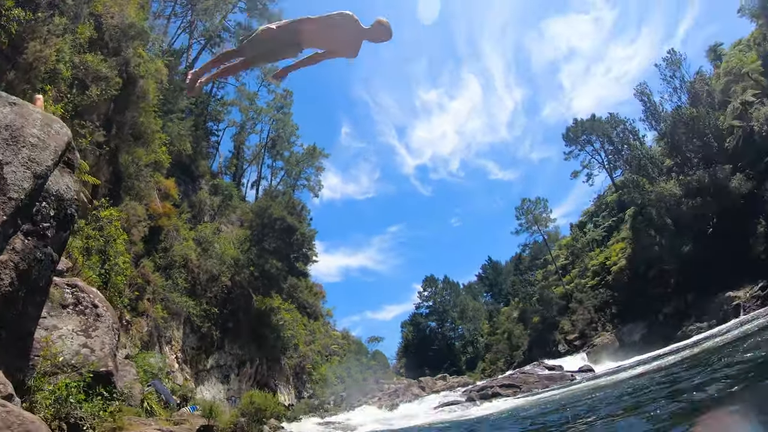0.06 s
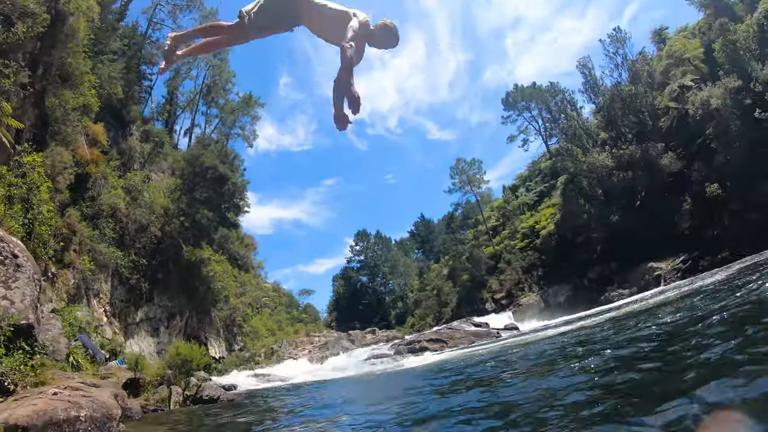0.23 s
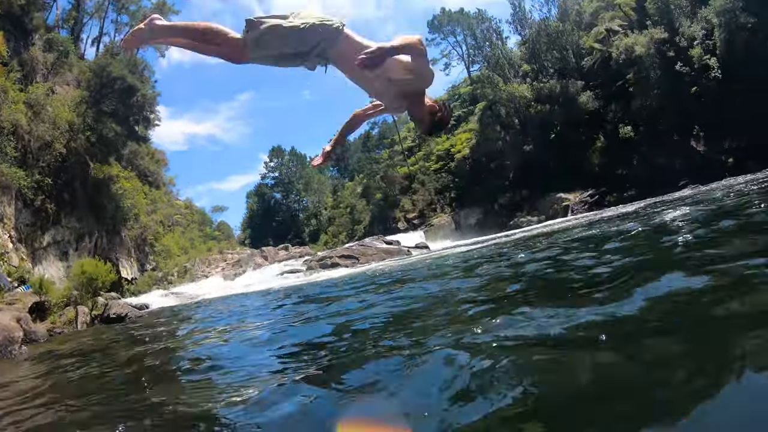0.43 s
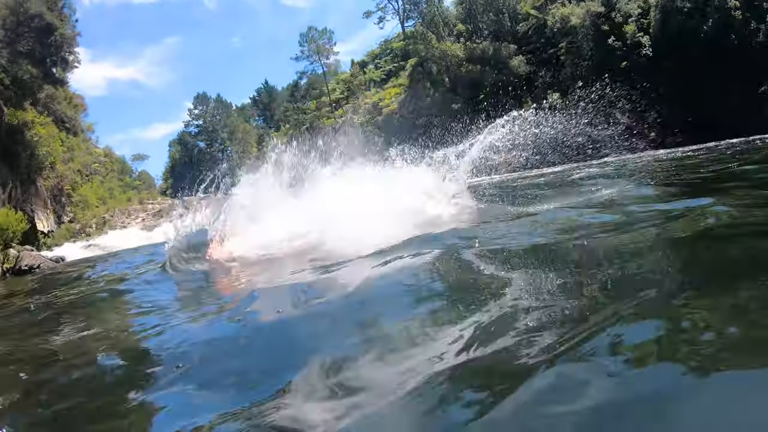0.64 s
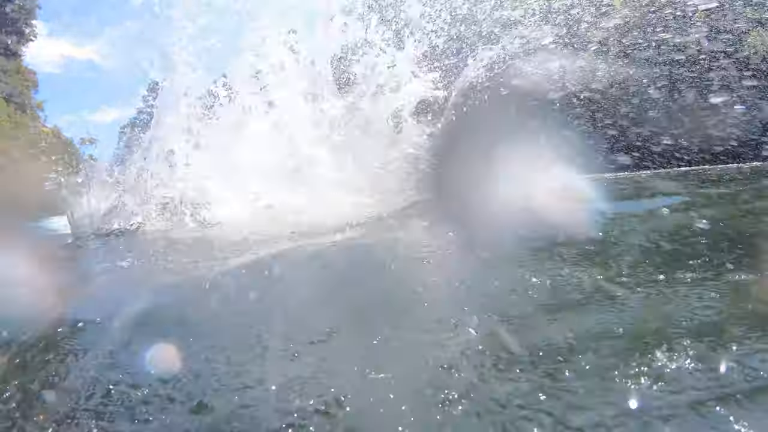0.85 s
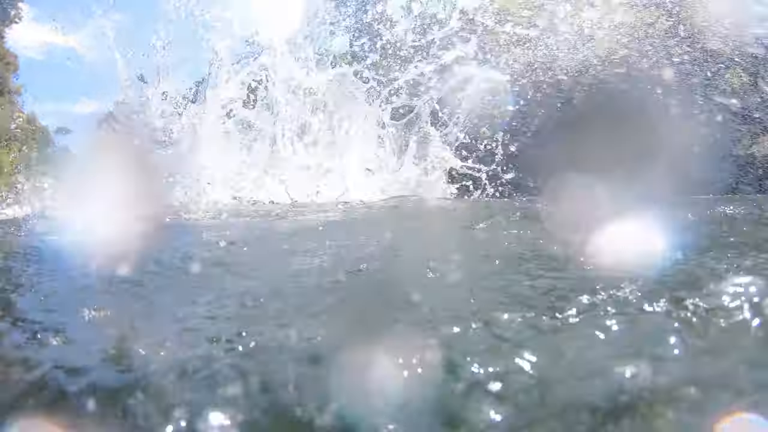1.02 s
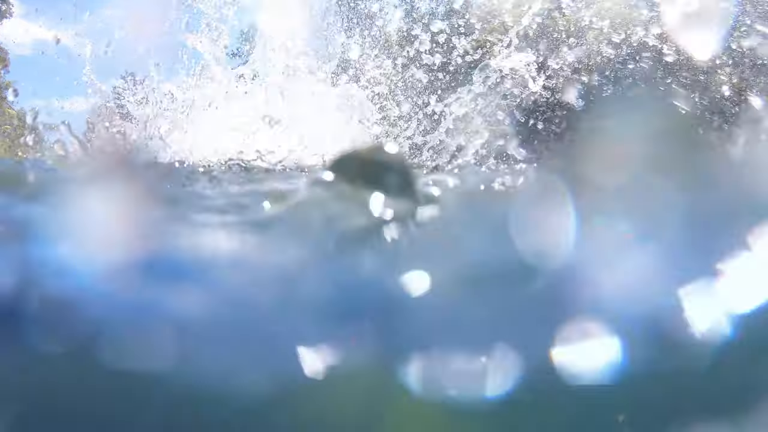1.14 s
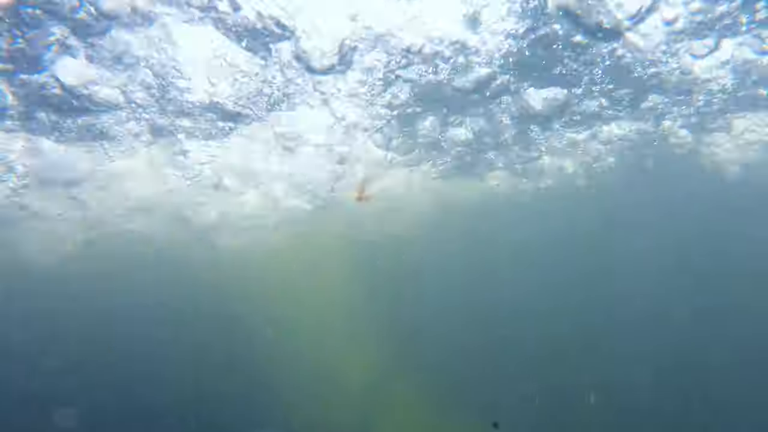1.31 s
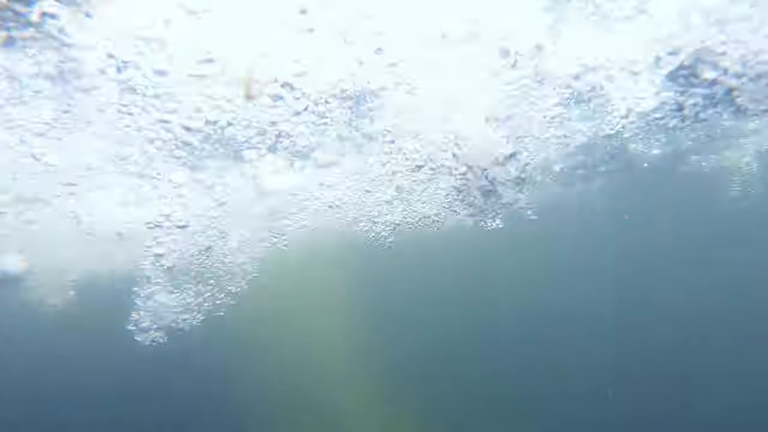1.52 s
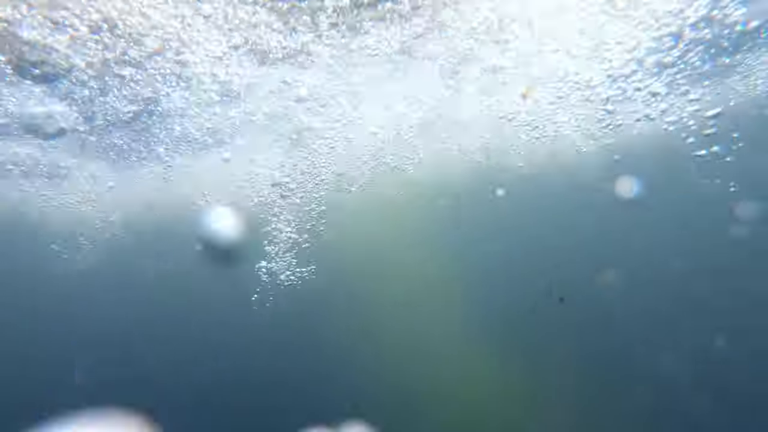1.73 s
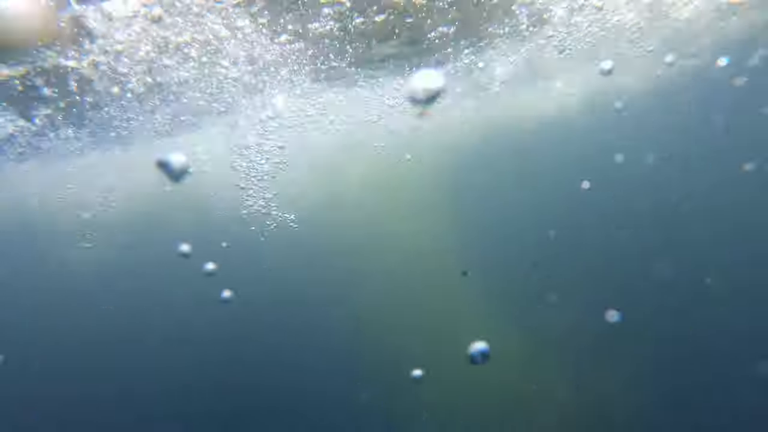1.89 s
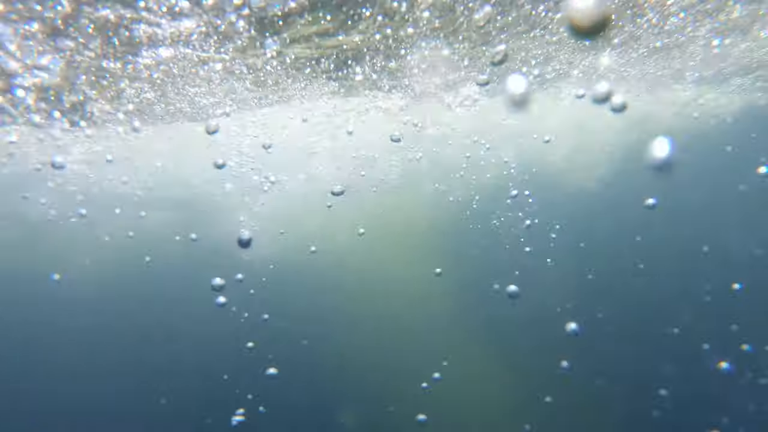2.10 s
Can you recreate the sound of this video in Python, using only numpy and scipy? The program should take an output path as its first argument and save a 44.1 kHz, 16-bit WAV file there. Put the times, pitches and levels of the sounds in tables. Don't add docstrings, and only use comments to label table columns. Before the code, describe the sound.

A diver's body smacks into river water with a big hissing splash, then muffled underwater bubbling

```python
import sys
import numpy as np
from scipy import signal
from scipy.fft import irfft
from scipy.io import wavfile

SR = 44100
rng = np.random.default_rng(int(sys.argv[2]) if len(sys.argv) > 2 else 0)


def attenuation_scalar(level_db):
    decades = np.asarray(level_db, float) / 20
    return 10 ** decades


def put_to_file(sound):
    columns = np.atleast_2d(sound).T
    safe = np.clip(columns, -1, 1)
    whole_steps = np.round(safe * 32767)
    wavfile.write(sys.argv[1], SR, whole_steps.astype(np.int16))


N = 94815
TIME = np.arange(N) / SR
SINK_S = 1.217
FLUTTER_END_S = 0.7


def rms_one(x):
    return x / np.sqrt(np.mean(x ** 2) + 1e-20)


def in_time(rows):
    s, *columns = np.transpose(rows)
    return [np.interp(TIME, s, c) for c in columns]


def drift(rate):
    step = 40
    r = np.exp(-2 * np.pi * rate * step / SR)
    warm_up = 2000
    noise = rng.standard_normal(N // step + warm_up + 2)
    slow = signal.lfilter([1], [1, -2 * r, r * r], noise)[warm_up:]
    return np.interp(np.arange(N) / step, np.arange(len(slow)), rms_one(slow))


def ring(clicks, hz, t60):
    r = attenuation_scalar(-60 / (t60 * SR))
    w = 2 * np.pi * hz / SR
    return signal.lfilter([0, np.sin(w)], [1, -2 * r * np.cos(w), r * r], clicks + 1e-18)


def grains(per_s, spread_db):
    size = attenuation_scalar(spread_db * np.minimum(rng.exponential(1, N), 5)) * rng.choice([-1, 1], N)
    return rms_one(size * (rng.random(N) < per_s / SR))


def coloured(sources, spectrum, patchy_db, rate, tilt_db=0):
    together = drift(rate)
    edges = 70 * 2 ** np.arange(0, 8.1, .5)
    hz_pts, db_pts = np.transpose(spectrum)
    out, power = 0, 0
    for k, (low, high) in enumerate(zip(edges, edges[1:])):
        hz = np.sqrt(low * high)
        level = np.interp(np.log(hz), np.log(hz_pts), db_pts)
        power += attenuation_scalar(level) ** 2 * (high - low) / SR * 2
        sos = signal.butter(2, [low, high], "band", fs=SR, output="sos")
        band = signal.sosfilt(sos, sources[k % 2])
        tilt = tilt_db * max(np.log2(hz / 1800), 0)
        flicker = patchy_db * (0.7 * together + drift(rate))
        out = out + band * attenuation_scalar(level + tilt + flicker)
    return out / np.sqrt(power)


def add(out, s, piece):
    i = int(s * SR)
    out[i:i + len(piece)] += piece[:len(out) - i]


def spray():
    # (time [s], level [dB], brightness [about 0-1])
    course = [(.622, -43, 1), (.632, -28.5, 0.8), (.66, -20, 1), (.695, -27, 0.88), (.703, -27.5, 0.67),
              (.733, -24, 0.35), (.745, -45.5, 0.3), (.8, -68.5, 1), (.87, -44, 0), (.93, -30.5, 0.02),
              (.955, -36, 0.1), (.98, -44, 0), (1.01, -32, 0), (1.06, -39, 0), (1.11, -30.5, -.1),
              (1.15, -32, -.25), (1.2, -26.5, -.3), (1.225, -49, -.3), (1.36, -67, 0)]
    # (frequency [Hz], level [dB per Hz])
    colour = [(100, 0.5), (350, -3.5), (700, -8), (1400, -10), (2800, -12), (5600, -14.5), (10000, -24),
              (15500, -30.5)]
    db, bright = in_time(course)
    fade_in = np.clip((TIME - course[0][0]) / 0.022, 0, 1)
    fade_out = np.clip((course[-1][0] - TIME) / 0.1, 0, 1)
    fine = grains(per_s=12000, spread_db=2.2)
    crackle = 0.3 * (1 - bright) * grains(per_s=600, spread_db=2.5)
    sources = [fine * bright + 0.67 * noise + crackle for noise in rng.standard_normal((2, N))]
    water = coloured(sources, colour, patchy_db=1.6, rate=74, tilt_db=11.5 * (bright - 1))
    return fade_in * fade_out * attenuation_scalar(db + 1.5) * water


def thumps():
    # (time [s], peak level [dB], frequency [Hz])
    pushes = [(0.656, -18, 76), (0.6841, -14.5, 190), (0.7338, -4, 315), (0.8338, -12.5, 145),
              (0.878, -20, 159), (.887, -28, 199), (0.896, -19.5, 180), (.951, -16.5, 178),
              (1.104, -25.5, 167), (1.129, -23, 179), (1.191, -20, 172), (0.9439, -13.5, 194),
              (1.2539, -10.5, 161), (1.274, -18, 153), (1.309, -8.5, 115.7), (1.3262, -2, 195),
              (1.331, -11.5, 213), (1.3633, -5.5, 226), (1.3655, -3, 189), (1.434, -11, 150.5),
              (1.4442, -13, 172), (1.477, -16.5, 144), (1.4993, -7, 160.6), (1.535, -20, 130),
              (1.582, -23.5, 170), (1.655, -18.5, 111), (1.638, -27.5, 147.5), (1.814, -26, 119.6),
              (1.882, -13.5, 89.3)]
    fade_cycles, softness, gain_db = 2.54, 1.24, 6
    out = np.zeros(N)
    t = np.arange(3000) / SR
    for s, db, hz in pushes:
        w = 2 * np.pi * hz
        fade = attenuation_scalar(-60 * t * hz / fade_cycles)
        soft_start = 1 - np.exp(-softness * w * t)
        add(out, s, attenuation_scalar(db + gain_db) * np.sin(w * t) * fade * soft_start)
    return out


def drops():
    # (time [s], peak level [dB], centre [Hz], decay [s])
    landings = [(.722, -9, 1250, 0.008), (.732, -20, 900, 0.0011), (0.751, -28.5, 4020, 0.00069),
                (0.771, -32, 8000, 0.00048), (0.839, -18.5, 3480, 0.00064), (0.845, -38.5, 6400, 0.00043),
                (.859, -24, 3350, 0.00093), (0.867, -28, 2620, 0.0019), (0.876, -18, 920, 0.0074),
                (.894, -21, 1240, 0.00081), (0.911, -11.5, 1350, 0.0011), (.916, -31, 1580, 0.00048),
                (0.926, -30, 3000, 0.00082), (0.928, -16.5, 3000, 0.0017), (0.9312, -23, 4000, 0.0007),
                (0.9417, -6.5, 2510, 0.00095), (0.948, -24, 3500, 0.00068), (.965, -37.5, 4500, 0.00048),
                (0.993, -26, 1770, 0.0023), (1.005, -28, 1790, 0.0011), (1.011, -20, 1450, .002),
                (1.026, -37.5, 3200, 0.0007), (1.043, -37.5, 4770, 0.00074), (1.095, -26, 4100, 0.0012),
                (1.116, -28.5, 4500, 0.00092), (1.126, -23.5, 3860, 0.0059), (1.171, -27, 4240, 0.006),
                (1.187, -36, 5600, 0.0011), (1.203, -10.5, 1170, 0.0014), (1.212, -16, 790, 0.0024)]
    # (time [s], peak level [dB], centre [Hz], decay [s])
    ticks = [(1.219, -33, 3600, 0.00084), (1.231, -45, 3600, 0.00092), (1.246, -41, 3600, .001),
             (1.274, -47, 4600, .002), (1.299, -42, 3800, .0012), (1.3012, -45, 5800, .001),
             (1.309, -45, 5600, 0.0012), (1.344, -49, 5200, 0.0017), (1.361, -46, 4600, 0.00062),
             (1.370, -35, 2400, 0.00079), (1.38, -45, 2300, 0.0018), (1.404, -43, 2100, 0.0018),
             (1.419, -37, 2000, 0.0017), (1.444, -41, 1800, 0.0016), (1.478, -47, 3300, 0.0018),
             (1.905, -55, 2400, .002), (2.028, -58, 5400, 0.00073), (2.106, -50.5, 3800, 0.0019),
             (1.252, -18.5, 800, 0.0023), (1.273, -23.5, 686, 0.0035), (1.302, -32.5, 2000, 0.0003),
             (1.308, -18, 686, 0.013), (1.324, -29.5, 5050, 0.00073), (1.329, -20.5, 1260, 0.00055),
             (1.339, -18.5, 750, 0.0058), (1.358, -41, 2240, 0.0015), (1.374, -15.5, 765, 0.0021),
             (1.392, -35.5, 1960, .003), (1.477, -23, 1010, 0.0034), (1.488, -13.5, 606, 0.0013),
             (1.5, -19, 870, 0.0028), (1.532, -24.5, 1040, 0.003), (1.547, -41, 1830, 0.0034),
             (1.835, -49.5, 2310, 0.0018), (1.988, -47, 2830, 0.0016), (2.062, -40.5, 3140, 0.0026)]
    out = np.zeros(N)
    t = np.arange(1200) / SR
    for s, db, hz, decay in landings + ticks:
        order, reach_down = (3, 1.4) if s > SINK_S else (2, 2)
        limits = [hz / reach_down, min(hz * 1.222, .45 * SR)]
        band = signal.butter(order, limits, "band", fs=SR, output="sos")
        splat = signal.sosfilt(band, rng.standard_normal(len(t)) * np.exp(-t / decay))
        add(out, s, attenuation_scalar(db) * splat / np.abs(splat).max())
    return out * attenuation_scalar(-4.5)


def bubbles():
    # (centre time [s], level [dB], frequency [Hz], half length [s])
    tones = [(0.863, -35.5, 1377, 0.004), (0.729, -17.5, 502, 0.0046), (1.534, -29.5, 742, 0.0072),
             (1.585, -26, 596, 0.0064), (1.594, -35.5, 828, 0.0036), (1.602, -23.5, 417.6, 0.0033),
             (1.614, -28.5, 558, 0.015), (1.634, -27, 988, 0.006), (1.708, -28.5, 633, 0.0061),
             (1.813, -15.5, 511, 0.0033), (1.839, -29.5, 619, 0.0024), (1.857, -24, 566, 0.0077),
             (1.879, -30.5, 619, 0.019), (1.856, -50, 1394, 0.004), (.888, -50, 1920, .005),
             (1.283, -36, 788, 0.0075), (1.403, -29, 349, 0.014), (1.783, -34, 596, 0.0037),
             (1.922, -32.5, 465, 0.0096), (1.948, -35.5, 339.5, 0.02), (2.005, -52, 1285, 0.0035),
             (2.018, -42.5, 364, 0.037), (2.048, -31, 220, 0.0071), (2.061, -52, 840, 0.011),
             (2.09, -50, 1250, 0.0026), (2.124, -43.5, 597, 0.017)]
    roughness, rise = 0.35, 0.03
    out = np.zeros(N)
    u = np.arange(-1500, 1500) / SR
    for s, db, hz, half in tones:
        swell = (1 + roughness * drift(150)[:len(u)]) * np.exp(-(u / half) ** 2)
        tone = np.cos(2 * np.pi * hz * (u + rise * u * u / half / 2))
        add(out, s + u[0], attenuation_scalar(db) * swell * tone)
    return out


def pops():
    # (time [s], peak level [dB], port ring level [dB])
    clicks = [
        (1.7185, -10.5, -48.5),
        (1.883, -13.5, -58.5),
        (1.966, -18, -61),
    ]
    out = np.zeros(N)
    f = np.arange(2049) * SR / 4096
    bass_cut = 1 / (1 + np.exp(np.clip((600 - f) / 10, -50, 50)))
    body = 1 / (1 + (f / 800) ** 2) ** 2.6 / (1 + (f / 3000) ** 8)
    port = np.exp(-((f - 3900) / 650) ** 2)
    for s, db, port_db in clicks:
        shape = bass_cut * (body - attenuation_scalar(port_db) * port)
        x = np.roll(irfft(shape * np.exp(1j * np.pi / 4)), 2048)
        add(out, s - 2048 / SR, attenuation_scalar(db) * x / np.abs(x).max())
    return out


def churn():
    # (time [s], level [dB])
    loudness = [(1.18, -44), (1.3, -37.5), (1.42, -32), (1.52, -29), (1.65, -29.5), (1.72, -39.5),
                (1.85, -37.5), (2.0, -40), (2.08, -40.5), (2.15, -40.5)]
    # (frequency [Hz], level [dB per Hz])
    colour = [(100, 6), (250, 3.5), (600, 6.5), (900, -10.5), (1300, -31), (1700, -33)]
    dealt = rng.integers(0, 16, N)

    clicks = grains(per_s=260, spread_db=2.2)
    gurgle = 0
    for k, hz in enumerate(np.geomspace(120, 950, 16)):
        gurgle = gurgle + ring(clicks * (dealt == k), hz, 18 / hz)
    murk = coloured(rng.standard_normal((2, N)), colour, patchy_db=4.0, rate=30.0)
    low_pass = signal.butter(8, 1400, fs=SR, output="sos")
    low = signal.sosfilt(low_pass, attenuation_scalar(-4) * rms_one(gurgle) + attenuation_scalar(-6) * murk)
    low = signal.lfilter(*signal.iirnotch(470, 3, SR), low)

    clicks = grains(per_s=3000, spread_db=2.5) * attenuation_scalar(3 * drift(40))
    fizz = 0
    for k, hz in enumerate(np.geomspace(1400, 4000, 16)):
        band = ring(ring(clicks * (dealt == k), hz, 40 / hz), hz, 8 / hz)
        fizz = fizz + rms_one(band) * (1600 / hz) ** 1.5 * attenuation_scalar(8.0 * drift(3.8))

    since_sink = TIME - SINK_S
    under = np.clip(since_sink / 0.01, 0, 1)
    fizz_gain = attenuation_scalar(-59 - 23 * since_sink)
    return under * (attenuation_scalar(in_time(loudness)[0]) * low + fizz_gain * rms_one(fizz))


def sizzles():
    # (centre time [s], level [dB], frequency [Hz], half length [s])
    patches = [(1.07, -57, 5250, 0.015), (1.168, -59, 6100, 0.019), (1.269, -69, 4570, 0.057),
               (1.309, -54, 3400, .012), (1.501, -79, 5370, 0.066), (1.866, -71, 3665, 0.032)]
    out = np.zeros(N)
    u = np.arange(-4000, 4000) / SR
    for s, db, hz, half in patches:
        t60 = 25 / hz
        band = rms_one(ring(ring(rng.standard_normal(len(u)), hz, t60), hz, t60))
        ragged = attenuation_scalar(db + 3.4 * drift(60)[:len(u)])
        add(out, s + u[0], ragged * np.exp(-(u / half) ** 2) * band)
    return out


def wind():
    # (time [s], level [dB])
    loudness = [(0, -34.5), (.08, -36), (.36, -26.5), (.41, -29), (.44, -21), (.57, -23.5), (.61, -28),
                (.64, -39), (.8, -41.5), (1.2, -35), (1.35, -34.5), (1.47, -30.5), (1.7, -40.5), (2.0, -44),
                (2.05, -36)]
    rumble = rng.standard_normal(N + SR)
    for _ in range(2):
        rumble = ring(rumble, 107, 0.3 / 11.2)
    rumble = rms_one(rumble[SR:])
    turn = np.cumsum(2 * np.pi * 52.58 * (1 + 0.1248 * drift(7.2)) / SR)
    flutter = 0.96 * (np.sin(turn) + 0.19 * np.sin(2 * turn + 1))
    flutter = flutter * np.clip((FLUTTER_END_S - TIME) * 40, 0, 1)
    rumble_share = np.where(TIME < FLUTTER_END_S, .18, .6)
    lumps_db = -drift(15.0)
    return (rumble_share * rumble + flutter) * attenuation_scalar(in_time(loudness)[0] + 0.9 + lumps_db)


def rapids():
    # (frequency [Hz], level [dB per Hz])
    colour = [(100, 2), (350, -10), (700, -16), (1400, -19.5), (2800, -33.5), (5600, -47.5), (10000, -57),
              (15500, -62.5)]
    # (time [s], level [dB])
    loudness = [(0, -42), (.6, -34.5), (.8, -34), (1.2, -76.5), (1.25, -55.5), (1.5, -63.5)]
    brighter_db = 2.68 * np.clip(TIME / FLUTTER_END_S, 0, 1) ** 2
    noise = rng.standard_normal((2, N))
    hiss = coloured(noise, colour, patchy_db=3.2, rate=2.2, tilt_db=brighter_db)
    return attenuation_scalar(in_time(loudness)[0]) * hiss


def scene():
    splash = spray() + thumps() + drops()
    under_water = bubbles() + pops() + churn() + sizzles()
    return (splash + under_water + wind() + rapids())[None]


def roll_off(x):
    return signal.sosfilt(signal.butter(12, 15720, fs=SR, output="sos"), x)


def record(dry):
    low_cut = signal.butter(2, 28, "high", fs=SR, output="sos")
    x = signal.sosfilt(low_cut, dry)
    mix = 1.042 * np.tanh(x / 0.84)
    return roll_off(mix)


dry = scene()
out = record(dry)
put_to_file(out)
```